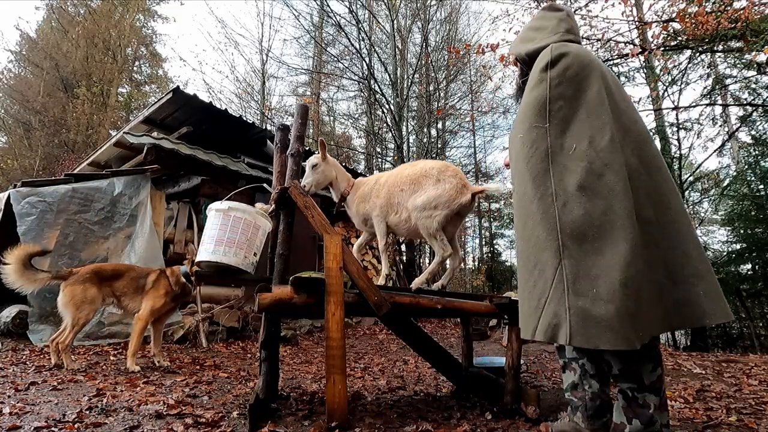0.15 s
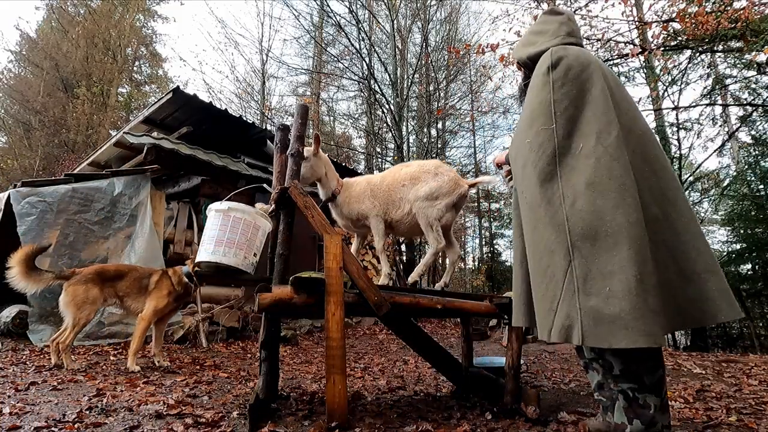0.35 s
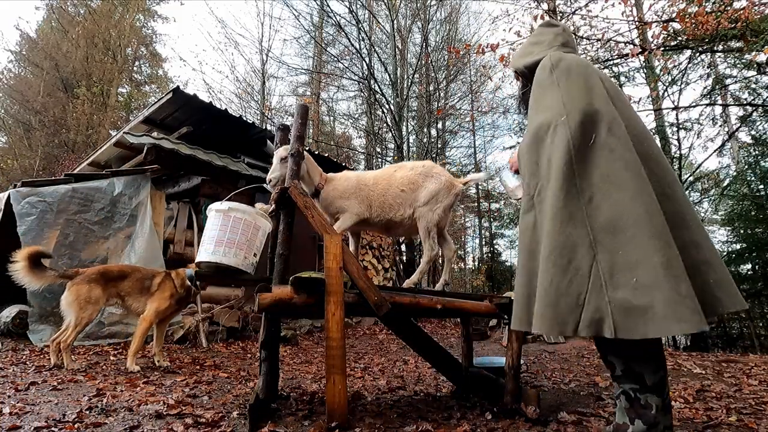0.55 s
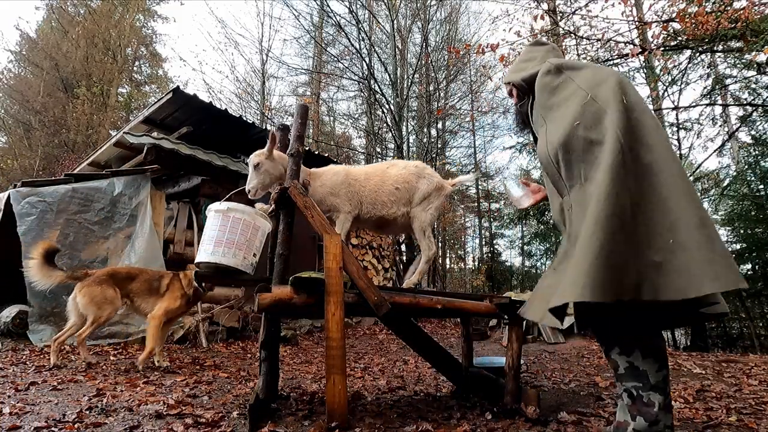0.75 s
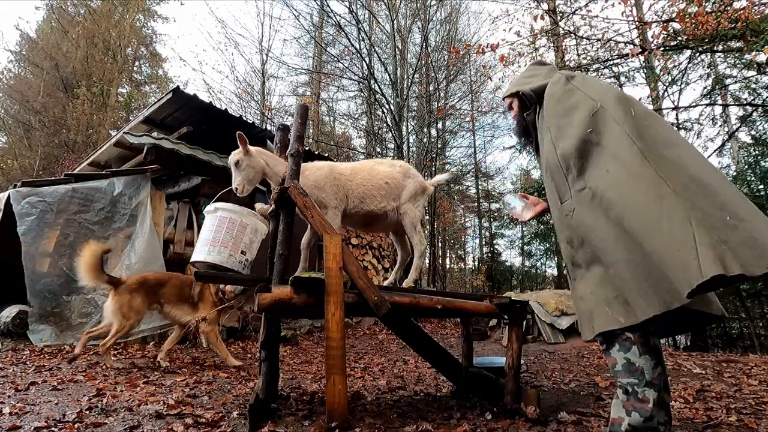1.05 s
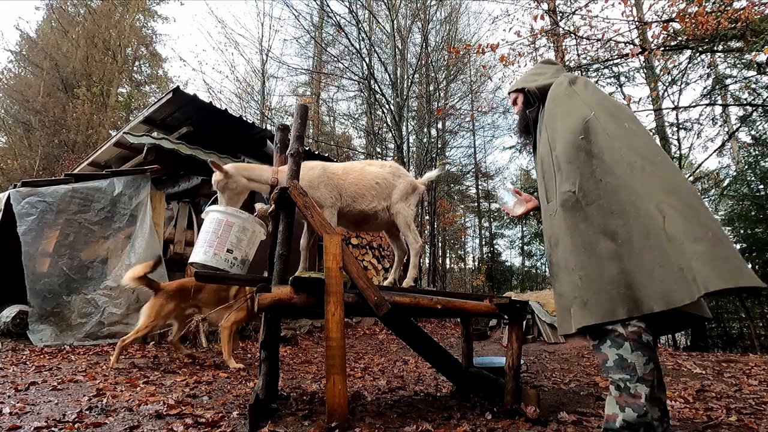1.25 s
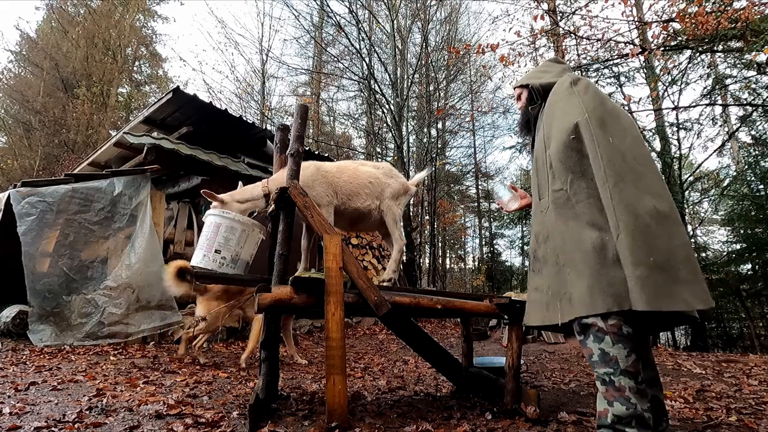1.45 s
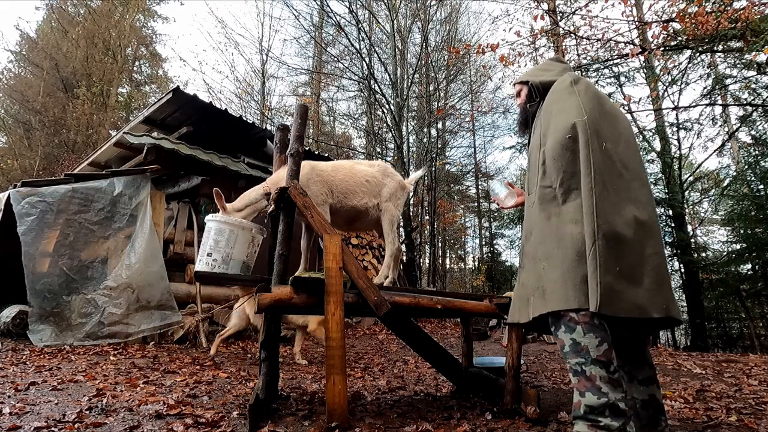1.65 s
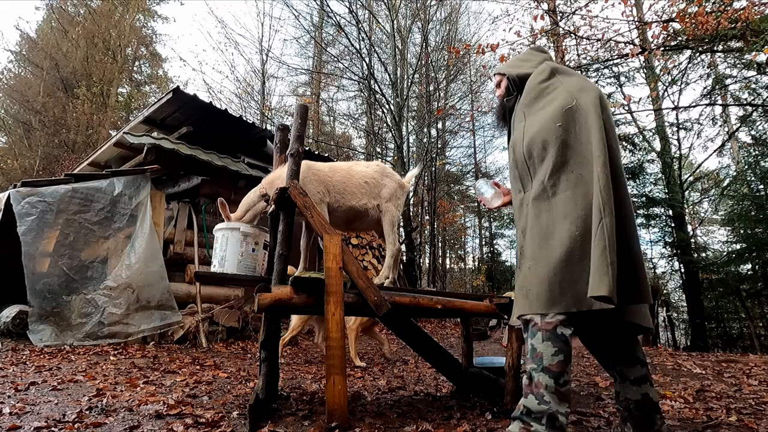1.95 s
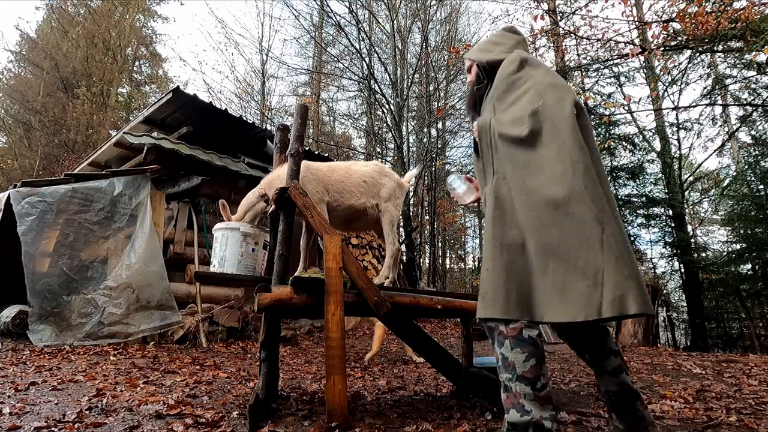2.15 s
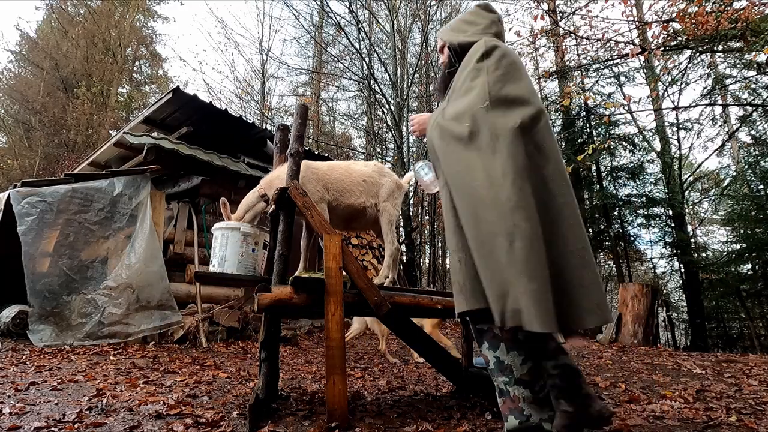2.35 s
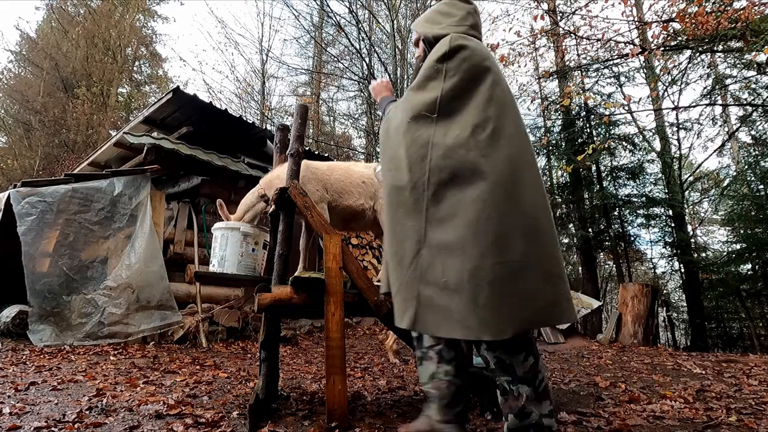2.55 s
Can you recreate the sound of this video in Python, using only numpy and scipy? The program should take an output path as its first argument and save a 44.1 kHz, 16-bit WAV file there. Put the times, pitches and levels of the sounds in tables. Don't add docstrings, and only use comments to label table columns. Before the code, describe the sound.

Hooves knock and scuff on planks outdoors before a plastic feed bucket rattles loudly as the goat shoves in.

```python
import sys
import numpy as np
from scipy import signal
from scipy.fft import rfft, irfft
from scipy.io import wavfile

SR = 44100
rng = np.random.default_rng(int(sys.argv[2]) if len(sys.argv) > 2 else 0)


def voltage_ratio(level):
    return 10 ** (np.asarray(level, float) / 20)


def transcribe(u):
    v = np.clip(np.atleast_2d(u).T, -1, 1)
    q = np.round(v * 32767).astype(np.int16)
    wavfile.write(sys.argv[1], SR, q)


N = 119070

# start_s, peak_db, plank_thud_over_crack_db, scuff_t60_s
HOOF_STEPS = [(0.004, -42.5, -23, 0.048), (0.167, -24.5, 1.5, 0.049), (0.196, -19, -9.5, 0.08),
              (0.234, -32.5, -24, 0.062), (0.254, -41, -20, 0.06), (0.321, -28.5, -22, 0.069),
              (0.329, -26.5, -7.5, 0.058), (0.338, -25, -12, 0.053), (0.362, -37.5, -2, 0.036),
              (0.454, -40.5, -9, 0.06), (0.569, -45, -1, 0.07), (0.588, -39.5, -3.5, 0.081),
              (0.612, -41, -0.5, 0.049), (0.656, -48, 2.5, 0.024), (0.766, -40, 1.5, 0.078),
              (0.866, -17.5, -9.5, 0.052), (0.887, -34.5, -2.5, 0.058), (0.915, -40.5, -17, 0.07),
              (0.987, -45, -8, 0.035), (1.003, -25, -10, 0.051), (1.021, -33, -8, 0.058),
              (1.042, -38, -14, 0.089), (1.172, -41.5, -4, 0.054)]
# start_s, peak_db
PLANK_BOOMS = [
    (1.413, -34),
    (1.688, -41.5),
    (1.843, -36.5),
    (1.95, -30.5),
    (2.113, -24.5),
    (2.166, -34.5),
    (2.249, -47.5),
]
# freq_hz, level_db, t60_s
PLANK_MODES = [(125, -5, 0.068), (173.6, -4.5, 0.095), (225.5, 0, 0.14), (273, -7.5, 0.051),
               (360, -1.5, 0.03), (513, -5, 0.043), (667, -6.5, 0.03)]
# freq_hz, level_db
HORN_SPECTRUM = [(260, -53), (450, -1), (1360, 6.5), (2640, -7), (3280, -16), (6920, -21.5), (14000, -83)]
# freq_hz, level_db, t60_s
POST_MODES = [(410, 8, .16), (520, 7, .06), (1494, -3, .075), (1950, -9, .04), (2514, -3, .045),
              (2800, -9, .025), (3400, -17, .02)]
# start_s, peak_db, rattle_t60_s,
# treble_re_peak_db
HANDLE_STRIKES = [(1.339, -39.5, 0.046, -15), (1.365, -36, 0.033, -28), (1.371, -20, 0.06, -30),
                  (1.399, -23, 0.049, -18), (1.405, -8.5, 0.067, -17), (1.409, -15, 0.087, -21.5),
                  (1.439, -24, 0.058, -24), (1.474, -40, 0.035, -25), (1.482, -21.5, 0.05, -37),
                  (1.495, -43, 0.058, -35), (1.557, -38, 0.037, -21), (1.597, -34, 0.077, -38),
                  (1.607, -26, 0.045, -34), (1.625, -18.5, 0.053, -17.5), (1.633, -36, 0.045, -30),
                  (1.671, -35.5, 0.02, -35), (1.683, -36.5, 0.065, -40), (1.737, -43, 0.042, -27),
                  (1.757, -38.5, 0.029, -35),
                  (1.782, -38, 0.044, -27), (1.788, -11, 0.042, -28), (1.793, -16, 0.042, -16),
                   (1.813, -12.5, 0.053, -15.5), (1.826, -24, 0.089, -24), (1.836, -9, 0.047, -11.5),
                   (1.856, -23.5, 0.056, -16), (1.873, -24, 0.052, -26), (1.897, -24.5, 0.084, -12),
                   (1.905, -17.5, 0.041, -11), (1.908, -12.5, 0.048, -31), (1.926, -34, .06, -27),
                   (1.946, -20.5, 0.048, -34), (1.958, -32, 0.065, -36), (2.067, -30, 0.052, -20),
                   (2.088, -7.5, 0.05, -20), (2.096, -8.5, 0.081, -13), (2.127, -15.5, 0.056, -14),
                   (2.132, -13, 0.068, -12.5), (2.141, -11.5, 0.054, -12), (2.148, -10.5, 0.039, -14.5),
                   (2.161, -16, 0.065, -16), (2.173, -18, 0.085, -16), (2.235, -26, 0.056, -17.5),
                   (2.24, -29, 0.052, -20), (2.258, -33.5, 0.072, -6), (2.655, -40.5, 0.075, -20)]
# freq_hz, level_db
WALL_SPECTRUM = [(500, -28), (900, -1), (1400, -3), (1950, 6), (2600, -4.5), (2950, -23.5), (4200, -15.5),
                 (12000, -47), (15000, -79)]
# freq_hz, level_db, t60_s
HOLLOW_MODES = [(234.3, -34, 0.14), (310.2, -34, 0.11), (4035, -27, 0.021)]
# start_s, peak_db
GRIT_SNAPS = [(.116, -42.5), (.135, -55), (.167, -39.5), (.197, -43.5), (.233, -56), (.322, -46),
              (.329, -31), (.339, -37), (.471, -37), (.496, -37), (.544, -39.5), (.652, -44), (.777, -48),
              (.866, -34), (.89, -47), (.915, -50), (1.0, -67), (1.53, -52), (1.738, -52), (1.773, -50),
              (1.855, -33.5), (1.873, -37.5), (2.259, -34.5)]
# freq_hz, level_db
SNAP_SPECTRUM = [(2500, -26), (4000, 4.5), (7000, -1), (11000, -16.5), (15000, -28)]
# start_s, peak_db
FITTING_JINGLES = [
    (.199, -35.5),
    (0.234, -41),
    (.253, -46),
    (0.327, -37.5),
    (.341, -44),
    (.348, -47),
    (0.364, -42),
    (0.474, -32.5),
    (0.591, -45),
    (.611, -46.5),
]
# start_s, peak_db
FRAME_JOLTS = [
    (0.789, -40.5),
    (1.41, -48),
    (1.93, -50),
    (2.091, -39),
    (2.127, -52),
    (2.469, -52.5),
]
# freq_hz, level_db, t60_s
FRAME_MODES = [(59, 0.28, 0.086), (84, -0.63, 0.042), (113, -1.8, 0.11)]
# time_s, level_db
RUSTLE_CURVE = [(0, -65.5), (.44, -59), (.55, -63), (.75, -63), (1.2, -63.5), (1.36, -53), (1.5, -55),
                (1.72, -70), (1.98, -57.5), (2.08, -48.5), (2.33, -60), (2.43, -53.5), (2.7, -57)]
# freq_hz, level_db
LEAF_SPECTRUM = [(240, -25), (400, -4.5), (971, 1), (3060, -6.5), (4700, -5.5), (11900, -24.5),
                 (15500, -78)]
# start_s, length_s, start_hz, end_hz, level_db
BIRD_CHIRPS = [
    (.598, .064, 3020, 3400, -56),
    (.654, .048, 3120, 2560, -57.5),
    (1.105, .04, 2850, 2600, -64),
]
# time_s, level_db
GUST_CURVE = [(0, -45), (.16, -68), (.26, -40.5), (.45, -65), (.63, -50), (.72, -60.5), (.9, -53),
              (1.05, -52.5), (1.2, -53.5), (1.27, -66), (1.42, -45), (1.62, -73), (1.79, -85), (1.9, -56),
              (2.02, -65), (2.12, -60), (2.4, -63.5), (2.7, -55)]
# freq_hz, level_db
WIND_SPECTRUM = [(20, -6), (43, 9.5), (90, -8), (300, -2)]
# freq_hz, level_db
AIR_SPECTRUM = [(59, -32), (100, -33), (188, 9), (447, -10.5), (5060, -9.5), (12000, -35.5), (15500, -61)]
# freq_hz, likeness_0_to_1
LIKENESS_CURVE = [(60, 1), (300, .92), (1500, 0.58), (12000, 1)]

HOOF_CYCLES, HOOF_GRAINS_PER_S, HOOF_SCUFF_DB, THUD_LAG_S = 26, 1800, -6.5, 0.0031
DULL_DB_PER_DB = .3
RAP_S, RAP_DB = .498, -26.5
PAIL_CYCLES, PAIL_GRAINS_PER_S, PAIL_RATTLE_DB = 17.7, 4000, -7
USUAL_TREBLE_DB = -17
NUDGE = (2.045, -37, .16, -22)
TOUCH_S, LEAD_S, LEAD_DB = .002, 0.0039, -17.5
TRAIL_CUT_HZ = 5600
CRISP_S, SWELL_SHARE = 0.061, 0.015
BOLT_MODES = [(2720, -1, .017), (2590, -6, .015)]  # freq_hz, level_db, t60_s
SNAP_T60_S = .045
LEAF_GRAINS_PER_S, LEAF_GRAIN_DB, LEAF_DB = 90, -16, 2
POP_S, POP_DB, POP_HZ, POP_T60_S = 1.5485, -31, 150, .05
AIR_DB = -56.5
YARD_T60_S, YARD_DB, YARD_CUT_HZ, YARD_GAP_S = 0.31, -12.5, 12000, 0.0038
WIDTH_DB, WIDTH_HZ = -9, 1200
HOOF_PAN_DB, PAIL_PAN_DB, BED_PAN_DB = -0.7, 0, -1.4
PORT_LAG_S, CUTOFF_HZ = 1.1e-5, 15600


def rms_one(x):
    return x / np.sqrt(np.mean(x ** 2) + 1e-20)


def in_time(rows):
    return np.interp(np.arange(N) / SR, *np.transpose(rows))


def at_hz(points, hz):
    hz_points, db_points = np.transpose(points)
    return np.interp(np.log(hz), np.log(hz_points), db_points)


def drift(rate):
    r = np.exp(-80 * np.pi * rate / SR)
    noise = rng.standard_normal(N // 40 + 2002)
    slow = rms_one(signal.lfilter([1], [1, -2 * r, r * r], noise)[2000:])
    return np.interp(np.arange(N) / 40, np.arange(len(slow)), slow)


def grains(size, per_s, spread_db):
    when, sign, strength = rng.random((3, size))
    level_db = spread_db * np.minimum(-np.log(strength + 1e-9), 4)
    return (when < per_s / SR) * np.sign(sign - .5) * voltage_ratio(level_db)


def ringing(modes, scatter_db, size=8192):
    hz, db, t60 = np.transpose(modes)[:, :, None]
    t = np.arange(size) / SR
    draw = rng.standard_normal((len(hz), 1))
    decay = voltage_ratio(db + scatter_db * (np.abs(draw) - 4.3) - 60 * t / t60)
    return np.sum(np.sign(draw) * decay * np.sin(2 * np.pi * hz * t), axis=0)


def dense_modes(spectrum, cycles, count):
    hz = np.geomspace(spectrum[0][0], spectrum[-1][0], count) * rng.uniform(1.0, 1.04, count)
    db = at_hz(spectrum, hz) + 20 * np.log10(hz / 2000)
    return np.transpose([hz, db, cycles / np.sqrt(hz * 1000)])


def add(out, s, sound):
    i = max(int((s - .005) * SR), 0)
    out[i:i + len(sound)] += sound[:len(out) - i]


def contact(body, db, t60, per_s, trail_db):
    t = np.arange(8192) / SR - .005
    t60 = max(t60, .004)
    noise = rng.standard_normal(8192)
    swell = np.maximum(1 - np.exp(-t / (SWELL_SHARE * t60)), 0)
    trail = voltage_ratio(trail_db - 60 * t / t60) * swell * grains(8192, per_s, 3.73) / 2
    force = signal.lfilter(*signal.butter(1, TRAIL_CUT_HZ, fs=SR), trail) * 1.25
    lead_in = voltage_ratio(LEAD_DB) * np.clip(1 + t / LEAD_S, 0, 1)
    force += noise * (t < TOUCH_S) * np.maximum(t / TOUCH_S, lead_in) / 4 * (CRISP_S / t60) ** 2
    sound = signal.fftconvolve(force, body)
    return voltage_ratio(db) * sound / np.max(np.abs(sound))


def banded_noise(spectrum, patchy_db, source):
    out, together = 0, drift(7.0)
    edges = 20 * 2 ** np.arange(0, 9.8, .5)
    for k, (low, high) in enumerate(zip(edges, edges[1:])):
        hz = np.sqrt(low * high)
        if spectrum[0][0] * .8 < hz < spectrum[-1][0] * 1.2:
            band = signal.butter(2, [low, high], "band", fs=SR, output="sos")
            mid, side = signal.sosfilt(band, source[k % 2])
            alike = np.clip(at_hz(LIKENESS_CURVE, hz), 0, 1)
            gain = voltage_ratio(at_hz(spectrum, hz) + patchy_db * (1.76 * together + drift(25)))
            out = out + gain * (np.sqrt(1 + alike) * mid + np.sqrt(1 - alike) * side * [[1], [-1]])
    return rms_one(out)


def hooves():
    out, horn = np.zeros(N), dense_modes(HORN_SPECTRUM, HOOF_CYCLES, count=70)
    for s, db, thud_db, t60 in HOOF_STEPS:
        tilt_db = DULL_DB_PER_DB * (thud_db + 13.5) * np.log2(horn[:, 0] / 1000)
        crack = ringing(horn - np.outer(tilt_db, [0, 1, 0]), 6.8, size=2048)
        add(out, s, contact(crack, db - 3.5, t60, HOOF_GRAINS_PER_S, HOOF_SCUFF_DB))
        thud = ringing(PLANK_MODES, 2.2)
        add(out, s + THUD_LAG_S, contact(thud, db + thud_db + 2.0, t60 * 1.33, 400, 0.33))
    for s, db in PLANK_BOOMS:
        add(out, s, contact(ringing(PLANK_MODES[1:], 2.6), db, 0.14, 400, 1.9))
    add(out, RAP_S - .024, contact(ringing(POST_MODES[2:4], 0.5), RAP_DB - 18, 0.036, 1500, -3.0))
    add(out, RAP_S, contact(ringing(POST_MODES, 0.5), RAP_DB + 2.5, 0.032, 1300, 4.8))
    return out


def pail():
    out, wall = np.zeros(N), dense_modes(WALL_SPECTRUM, PAIL_CYCLES, count=110)
    wall_band = signal.butter(2, [750, 9500], "band", fs=SR)
    for s, db, t60, treble_db in HANDLE_STRIKES + [NUDGE]:
        tilt_db = (treble_db - USUAL_TREBLE_DB) * (wall[:, 0] > 3000)
        struck = ringing(wall + np.outer(tilt_db, [0, 1, 0]), 3.11, size=2048)
        body = np.pad(signal.lfilter(*wall_band, struck) / 5, (0, 2048))
        body = body + ringing(HOLLOW_MODES, 2.12, size=4096)
        add(out, s, contact(body, db, t60, PAIL_GRAINS_PER_S, PAIL_RATTLE_DB))
    return signal.lfilter(*signal.butter(2, 160, "high", fs=SR), out)


def litter():
    out, crisp = np.zeros(N), dense_modes(SNAP_SPECTRUM, 6.9, count=50)
    for s, db in GRIT_SNAPS:
        add(out, s, contact(ringing(crisp, 2.2, size=512), db, SNAP_T60_S, 3000, 1.0))
    for s, db in FITTING_JINGLES:
        add(out, s, contact(ringing(BOLT_MODES, .5, size=2048), db, .03, 1500, -3.0))
    for s, db in FRAME_JOLTS:
        add(out, s, contact(ringing(FRAME_MODES, 4.5), db, 0.069, 400, 0.0))
    return out


def width(x):
    scatter = rng.standard_normal(1024) * voltage_ratio(-np.arange(1024) / 20)
    side = signal.fftconvolve(x, scatter / np.linalg.norm(scatter))[:N]
    side = signal.lfilter(*signal.butter(1, WIDTH_HZ, "high", fs=SR), side)
    return voltage_ratio(WIDTH_DB) * side * np.array([[1], [-1]])


def yard(x):
    t = np.arange(SR // 3) / SR
    mid, side = rng.standard_normal((2, len(t))) * voltage_ratio(-60 * t / YARD_T60_S) * (t > YARD_GAP_S)
    echoes = mid + .5 * side * np.array([[1], [-1]])
    echoes = signal.lfilter(*signal.butter(1, YARD_CUT_HZ, fs=SR), echoes)
    echoes = echoes / np.sqrt(np.sum(echoes ** 2) / 2)
    return voltage_ratio(YARD_DB) * signal.fftconvolve(x[None], echoes, axes=1)[:, :N]


def leaves():
    rub = rng.standard_normal((2, 2, N))
    crackle = rms_one(grains(N, LEAF_GRAINS_PER_S * voltage_ratio(6.7 * drift(11)), 15.0))
    source = rub + voltage_ratio(LEAF_GRAIN_DB) * crackle * [[1], [.3]]
    return voltage_ratio(in_time(RUSTLE_CURVE) + LEAF_DB) * banded_noise(LEAF_SPECTRUM, 1.2, source)


def bird():
    out = np.zeros(N)
    for s, length_s, start_hz, end_hz, db in BIRD_CHIRPS:
        way = np.linspace(0, 1, int(length_s * SR))
        hz = start_hz + (end_hz - start_hz) * way ** .5
        swell = np.sin(np.pi * way ** .7) ** .5
        add(out, s + .005, voltage_ratio(db) * swell * np.sin(2 * np.pi * np.cumsum(hz) / SR))
    return out * voltage_ratio(3 * drift(90))


def puff():
    out, t = np.zeros(N), np.arange(4096) / SR
    hz = POP_HZ * (.5 + 5 * np.exp(-t / .0012))
    add(out, POP_S + .005, voltage_ratio(POP_DB - 60 * t / POP_T60_S) * np.sin(2 * np.pi * np.cumsum(hz) / SR))
    return out


def wind(white):
    return voltage_ratio(in_time(GUST_CURVE)) * banded_noise(WIND_SPECTRUM, 3.5, white)


def air(white):
    return voltage_ratio(AIR_DB - 3) * banded_noise(AIR_SPECTRUM, 1.6, white)


def scene():
    side = np.array([[.5], [-.5]])
    white = rng.standard_normal((2, 2, N))
    bed = leaves() + air(white) + wind(white[::-1, :, ::-1])
    wood, plastic = hooves() + litter(), pail()
    strikes = wood + plastic
    near = wood * voltage_ratio(HOOF_PAN_DB * side) + plastic * voltage_ratio(PAIL_PAN_DB * side)
    near = near + yard(strikes) + width(strikes)
    bed = bed + bird() + puff()
    return near + bed * voltage_ratio(BED_PAN_DB * side)


def low_pass(x):
    return signal.sosfilt(signal.butter(12, 15640, fs=SR, output="sos"), x)


def record(dry):
    hz = np.arange(N // 2 + 1) * SR / N
    lag_s = np.array([[PORT_LAG_S], [0]])
    ports = irfft(rfft(dry) * np.exp(-2j * np.pi * hz * lag_s), N)
    top_cut = signal.cheby2(10, 60, CUTOFF_HZ, fs=SR, output="sos")
    mix = signal.sosfilt(top_cut, ports)
    return low_pass(mix)


dry = scene()
out = record(dry)
transcribe(out)
```